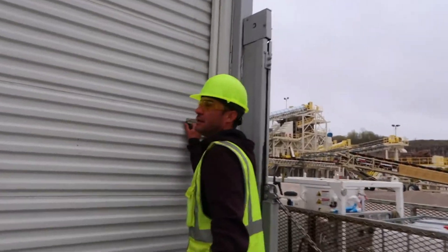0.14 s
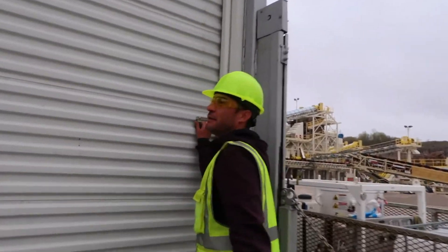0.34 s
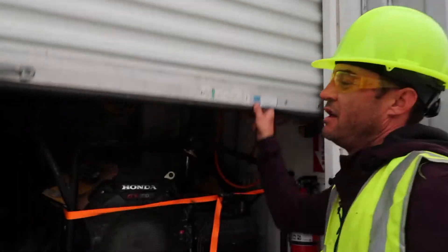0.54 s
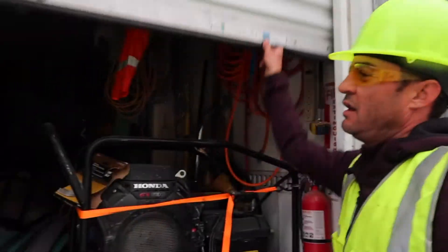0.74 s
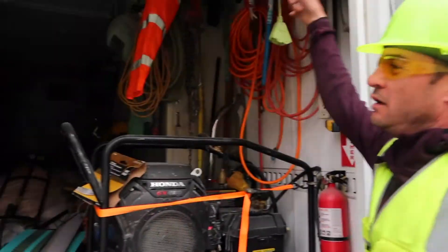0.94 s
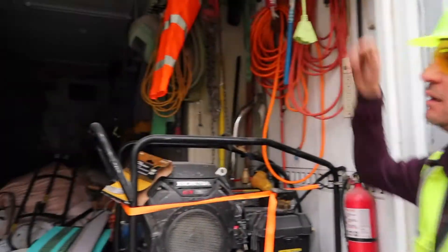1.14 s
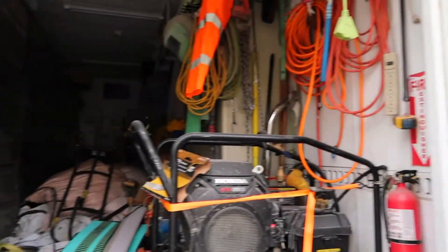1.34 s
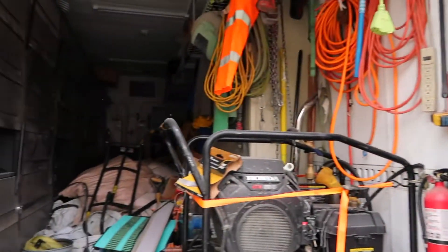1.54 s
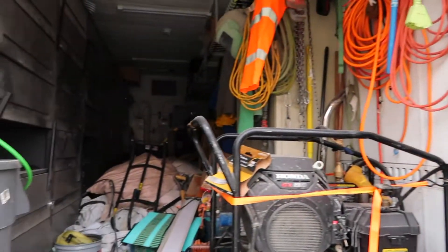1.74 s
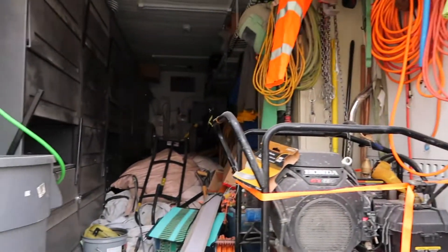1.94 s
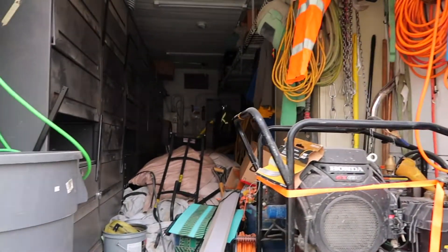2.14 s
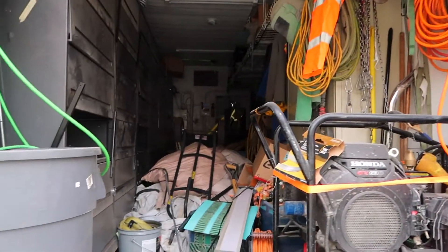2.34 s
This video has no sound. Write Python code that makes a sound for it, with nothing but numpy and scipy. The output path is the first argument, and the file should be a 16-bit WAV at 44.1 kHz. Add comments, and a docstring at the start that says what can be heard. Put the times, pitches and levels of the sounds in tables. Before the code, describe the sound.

A slatted metal roll-up door groans free and clatters rapidly up its tracks, outdoors, close by

```python
"""Slatted trailer door running up

A slatted metal door is pulled free, groaning and scraping, and runs up its tracks outdoors; it stops, then clatters again.
Streams of tiny knocks shake panel, hollow box and loose fittings: rumble, boom, rattle, and a rough note per slat clank.
Wavering tones make the groans and the clear notes of the box; filtered impulses make the hard knocks.
Filtered noise makes the scrape and a work site's far drone, with a sine for its thin whine.
"""
import sys
import numpy as np
from scipy import signal
from scipy.fft import rfft, irfft, next_fast_len
from scipy.io import wavfile
from scipy.ndimage import map_coordinates

SR = 44100
rng = np.random.default_rng(int(sys.argv[2]) if len(sys.argv) > 2 else 0)


def elevation(decibels):
    """Turn decibel levels (scalar or array-like) into linear amplitude ratios."""
    levels = np.asarray(decibels, float)
    return 10 ** (levels / 20)


def wrap_up_sound(samples):
    """Save the sound to the file named by the first command line argument, as 16-bit audio."""
    columns = np.atleast_2d(samples).T
    # keep every value between -1 and 1, then stretch to whole-number steps
    tamed = np.clip(columns, -1, 1)
    steps = np.round(tamed * 32767).astype(np.int16)
    wavfile.write(sys.argv[1], SR, steps)


N = 109412  # length in samples


def unit(x):
    """Scale to rms 1."""
    return x / np.sqrt(np.mean(x ** 2) + 1e-20)


def along(points, hz):
    """Read a curve of (f/Hz, value) points on a log frequency axis."""
    f, value = np.transpose(points)
    return np.interp(np.log(hz + 1), np.log(f + 1), value)


def curves(rows):
    """Straight-line automation: one value per sample for each column after the time."""
    t, *columns = np.transpose(rows)
    return [np.interp(np.arange(N) / SR, t, column) for column in columns]


def wobble(rate):
    """A smooth random curve with rate knots a second."""
    knots = rng.standard_normal(int(N * rate / SR) + 4)
    return map_coordinates(knots, [np.arange(N) * rate / SR])


def filtered(x, response):
    """Apply a complex response of frequency to x."""
    m = 2 * next_fast_len((N + SR // 2) // 2)
    return irfft(rfft(x, m) * response(np.fft.rfftfreq(m, 1 / SR)), m)[..., :N]


def causal(points, hz):
    """Minimum-phase response with the gain of (f/Hz, level/dB) points: it rings only after the hit."""
    cepstrum = irfft(np.log(elevation(along(points, hz))))
    cepstrum[1:len(hz) - 1] *= 2
    cepstrum[len(hz):] = 0
    return np.exp(rfft(cepstrum))


def resonances(peaks, f):
    """Sum of damped resonances (f/Hz, width/Hz, level/dB) with alternating sign."""
    total = 0
    for k, (centre, width, db) in enumerate(peaks):
        damping = 1j * f * width
        total = total + (-1) ** k * elevation(db) * damping / (centre ** 2 - f * f + damping)
    return total


def body(response):
    """Scale a response so that white noise keeps its rms."""
    return lambda hz: response(hz) / np.sqrt(np.mean(np.abs(response(hz)) ** 2))


def smear(x, decay):
    """Noise tails of energy 1 dying by (f/Hz, t60/s); each .08 s fades to a fresh one, so no fixed tone builds up."""
    hop = int(.08 * SR)
    window = np.sin(np.pi * np.arange(2 * hop) / (2 * hop))
    out = np.zeros(N + SR)
    x = np.pad(x, (hop, 2 * hop))
    for start in range(0, N + hop, hop):
        hz, t, z = signal.stft(rng.standard_normal(SR // 8), SR, nperseg=256)
        dying = z * elevation(-60 * t / along(decay, hz)[:, None])
        tail = signal.istft(dying, SR, nperseg=256)[1]
        part = signal.fftconvolve(x[start:start + 2 * hop] * window, tail / np.linalg.norm(tail))
        out[start:start + len(part)] += part
    return out[hop:hop + N]


def contacts():
    """A dense stream of tiny metal knocks of very uneven size, rms 1."""
    per_s, spread_db = 6330, 2.5  # approximate rate of the strong knocks; dB per unit of size
    chance, size, sign = rng.random(N), rng.exponential(size=N), rng.standard_normal(N)
    chosen = 1 / (1 + (chance * SR / per_s) ** 4)
    return unit(chosen * sign * elevation(spread_db * np.minimum(size, 3)))


def blow(s, db, rise, t60):
    """Strength of one jolt: quick rise, a hard short first contact, then dying away."""
    age = np.maximum(np.arange(N) / SR - s, 0)
    first = elevation(3 - 60 * age / 0.0078)  # 3 dB over the rest, t60 7.8 ms
    return (1 - np.exp(-age / rise)) * elevation(db) * (first + elevation(-60 * age / t60))


def wavering(hz, waver_hz):
    """A tone of rms 1 whose pitch wanders quickly."""
    return np.sqrt(2) * np.sin(2 * np.pi * np.cumsum(hz + waver_hz * wobble(60)) / SR)


# tone of the far machinery, relative: f/Hz, level/dB per Hz
SITE_TONE = [(15, -18), (25, -6), (70, -4), (257, -15), (472, -17.5), (722, -22.5), (2030, -27.5),
             (10500, -65), (11900, -66), (12900, -62), (14000, -85.5)]
# width of the drone: f/Hz, side over mid level/dB
SITE_WIDTH = [(60, -62), (180, -33), (550, -17), (1650, -10.5), (4970, 1.5), (15000, 6)]
# loudness of the drone: t/s, level/dB
SITE_LEVEL = [(0, -30), (1.85, -38.5), (2.48, -33)]


def site():
    """Far machinery: shaped noise as a wide drone, and a sine as a faint thin whine."""
    def tone(hz):
        return elevation(along(SITE_TONE, hz)) * elevation([0 * hz, along(SITE_WIDTH, hz)])

    mid, side = filtered(rng.standard_normal((2, N)), tone)
    level_db, = curves(SITE_LEVEL)
    drone = elevation(level_db + 0.83 * wobble(36)) * unit(np.array([mid + side, mid - side]))
    whine = elevation(-87 + 3 * wobble(15)) * np.sin(2 * np.pi * 13000 * np.arange(N) / SR)
    return drone + whine * [[1], [-.3]]  # the whine is weaker and inverted on the right


# the door on its rollers, levels before scaling by 0.918:
# t/s, panel rumble level/dB, box thud level/dB, hum level/dB, fitting rattle level/dB
ROLLING = [(0, -26, -31.5, -41, -36.5), (.2, -40.5, -29.5, -37, -82), (.36, -27.5, -26, -39, -50.5),
           (.42, -32.5, -22, -32.5, -34), (.62, -25, -31.5, -28, -31.5), (.8, -24, -40.5, -30, -36),
           (1, -28, -25.5, -28, -35.5), (1.1, -30.5, -33.5, -37.5, -42.5), (1.33, -26.5, -31.5, -34, -41.5),
           (1.47, -27.5, -33, -33.5, -43), (1.63, -33.5, -37.5, -38.5, -49), (1.71, -47, -37.5, -33, -52),
           (1.82, -50.5, -43, -56.5, -96)]


def rolling():
    """Power with which the rolling shakes panel, box, hum, lower fittings and bright fittings."""
    bright_db = -17  # bright fittings against the lower ones, scaled alike
    *rest_db, rattle_db = curves(ROLLING + [(ROLLING[-1][0] + .1, -90, -90, -90, -90)])
    db = np.array([*rest_db, rattle_db, rattle_db + bright_db])
    return elevation(2 * 0.918 * (0.86 * wobble(29.94) + db))


# tone of the slatted panel, relative: f/Hz, level/dB per Hz
PANEL_TONE = [(200, -22.5), (350, -2.5), (480, -3), (700, 0.5), (1300, -5.5), (2200, -12), (4000, -38.5),
              (8800, -64)]


def panel(shaken):
    """Knocks colour themselves in the panels as a rumble."""
    return filtered(shaken, body(lambda f: causal(PANEL_TONE, f)))


# low modes of the box, relative, before the roll-off: f/Hz, width/Hz, level/dB
BOX_MODES = [(104.4, 38, -1), (195.5, 36, -2), (417.8, 36, -6.5)]
# the door's ringing hum, relative, before the roll-off: f/Hz, width/Hz, level/dB
HUM_MODES = [(255.8, 77, -1.5), (320, 49, -2)]


def hollow_box(thudding, humming):
    """Knocks ring the low modes of the hollow box and the hum, both rolled off above 500 Hz."""
    thud = filtered(thudding, body(lambda f: resonances(BOX_MODES, f) / (1 + 1j * f / 500)))
    return thud + filtered(humming, body(lambda f: resonances(HUM_MODES, f) / (1 + 1j * f / 500)))


# tone of the loose fittings, relative: f/Hz, level/dB per Hz
FITTING_TONE = [(1180, -32), (2000, -0.5), (3020, -4), (5130, -8), (8860, -21.5), (12000, -28.5),
                (15500, -40)]
# jingle of the fittings, relative: f/Hz, width/Hz, level/dB
JINGLE_MODES = [(4030, 15.4, -0.5), (5660, 23, -6), (11300, 82, -10)]


def fittings(low, bright):
    """Knocks rattle and jingle the loose fittings in two ranges, lower and bright, with separate levels."""
    split_hz = 11000

    def metal(f):
        return causal(FITTING_TONE, f) * (1 + 2 * elevation(-10) * resonances(JINGLE_MODES, f))

    def upper(f):
        return (1j * f / split_hz / (1 + 1j * f / split_hz)) ** 4

    rattle = filtered(bright, body(lambda f: metal(f) * upper(f)))
    return rattle + filtered(low, body(lambda f: metal(f) / (1 + 1j * f / split_hz) ** 2))


# the door flexes and groans under the pull; the last row is a faint soft bump in the quiet:
# t/s, level/dB, f/Hz, t60/s
GROANS = [(0.0, -20, 710, 0.34), (0.056, -25, 425, .3), (0.067, -26.5, 696, 0.32), (0.123, -24, 742, 0.061),
          (0.237, -22, 650, .25), (0.312, -20.5, 618, 0.099), (0.344, -20, 668, .3),
          (2.075, -38.5, 407, 0.11)]


def groans():
    """Groans of the flexing door and a soft bump: quickly wavering tones that start fast and die away."""
    return sum(blow(s, db, 0.0028, t60) * wavering(hz, 45.3) for s, db, hz, t60 in GROANS)


# jolts of the fittings, before trims: t/s, level/dB, brightest part over it level/dB, t60/s
RATTLES = [(0.0024, -36, -34, 0.22), (0.285, -28.5, -22, 0.42), (0.3862, -12, -24, 0.16),
           (0.398, -13.5, -8, 0.1), (0.413, -13.5, -15, 0.17), (0.457, -10, -16.5, 0.06),
           (0.505, -12, -17, 0.25), (0.5184, -15.5, -7, 0.056), (0.591, -21.5, -14, 0.4),
           (0.6225, -13.5, -10.5, 0.14), (0.7138, -9, -17.5, 0.14), (0.821, -22, -41, 0.13),
           (0.8474, -27, -22, 0.54), (0.8977, -22, -22, 0.44), (0.9617, -21.5, -22, 0.38),
           (1.018, -24.5, -15.5, 0.14), (1.1264, -25.5, -19, 0.25), (1.2587, -17.5, -27, 0.2),
           (1.3546, -21.5, -21.5, 0.5), (1.3803, -16.5, -25, 0.12), (1.556, -23.5, -32, 0.052),
           (2.4198, -18, -17, 0.21), (2.4677, -13, -19, 0.21)]


def rattle_jolts():
    """Power with which single jolts shake the lower and the bright fittings."""
    trim_db, bright_trim_db, rise_s = -7, 6.5, 0.0022
    power = np.zeros((2, N))
    for s, db, bright, t60 in RATTLES:
        power += (blow(s, db + trim_db, rise_s, t60) * elevation([[0], [bright + bright_trim_db]])) ** 2
    return power


# tone of the scrape, relative: f/Hz, level/dB per Hz
SCRAPE_TONE = [(2350, -24), (4000, 5.5), (6250, -9), (11900, -2), (15500, -31)]
# the slide scraping as the door is freed: t/s, level/dB
SCRAPE_LEVEL = [(.225, -75), (.25, -51), (.29, -46), (.32, -44), (.385, -52)]


def scrape():
    """A fine bright hiss swells while metal slides on metal."""
    silent_after = SCRAPE_LEVEL[-1][0] + .02
    db, = curves([(0, -100)] + SCRAPE_LEVEL + [(silent_after, -100)])
    hiss = unit(filtered(rng.standard_normal(N), lambda hz: elevation(along(SCRAPE_TONE, hz))))
    return elevation(db + 0.91 * wobble(25)) * hiss


# slats clanking round the bend, before trims: t/s, level/dB, boom over it level/dB, f/Hz, t60/s
CLANKS = [(0.384, -5, -7.5, 755, 0.48), (0.431, -8, -6, 690, 0.14), (0.483, -9, -1, 672, 0.54),
          (0.512, -1.5, -26, 1203, 0.15), (0.53, -11, -11, 710, 0.19), (0.565, -6.5, 7.5, 638, 0.13),
          (0.596, -5, -3.5, 594, 0.34), (0.622, -17, -21, 950, 0.29), (0.72, -13, -25, 1530, 0.27),
          (0.845, -12.5, 1, 1360, 0.59), (0.913, -10.5, -6, 527, 0.34), (0.961, -10, -1.5, 830, 0.45),
          (0.989, -5, -23, 560, 0.2), (1.133, -6, -15, 720, 0.22), (1.166, -7.5, 2, 645, 0.054),
          (1.253, -4, -10, 923, 0.23), (1.372, -9, -11, 1550, 0.3), (1.393, -10.5, 4, 1010, 0.25),
          (1.43, -6.5, -25, 1480, 0.078), (1.563, -10.5, -15, 1390, 0.15), (1.612, -20, -22, 544, 0.12),
          (1.652, -10, -4.5, 1104, 0.19), (2.42, -9.5, -0.5, 1540, 0.18), (2.463, -5.5, -6, 1176, 0.15)]
CLANK_TRIM_DB, CLANK_RISE_S = -11, 0.0013


def clank_jolts():
    """Power with which each clank shakes panel, box and hum."""
    thud_trim_db, hum_trim_db = -7, 0.5
    power = np.zeros((3, N))
    for s, db, boom, hz, t60 in CLANKS:
        shares = elevation([[0], [boom + thud_trim_db], [boom + hum_trim_db]])
        power += (blow(s, db + CLANK_TRIM_DB, CLANK_RISE_S, t60) * shares) ** 2
    return power


def clank_notes():
    """Each slat sounds a rough note of its own: knocks through two equal resonances in a row."""
    note_trim_db, width = -4.5, 0.2  # width of each resonance over its pitch
    total = np.zeros(N)
    for s, db, boom, hz, t60 in CLANKS:
        knocks = contacts() * blow(s, db + CLANK_TRIM_DB + note_trim_db, CLANK_RISE_S, t60)
        b, a = signal.iirpeak(hz, 1 / width, SR)
        note = signal.lfilter(b, a, signal.lfilter(b, a, knocks))
        total += note / np.sqrt(np.pi * width * hz / SR / 2)
    return total


# the open box rings on clear notes near 260 to 280 Hz, in swells: start t/s, end t/s, level/dB, f/Hz
RINGS = [(0.552, 0.638, -22.5, 280.6), (1.104, 1.18, -24, 261.4), (1.201, 1.327, -25, 260),
         (1.361, 1.436, -19, 261.7), (1.45, 1.525, -26, 264.3), (1.538, 1.637, -31, 255.8),
         (1.666, 1.739, -32, 283)]


def rings():
    """Clear, slightly wavering notes that swell and fade."""
    edge_s, waver_hz = 0.02, 5.3
    t = np.arange(N) / SR
    total = np.zeros(N)
    for start, end, db, hz in RINGS:
        swell = np.clip(np.minimum(t - start, end - t) / edge_s, 0, 1)
        total += swell * elevation(db) * wavering(hz, waver_hz)
    return elevation(1.3 * wobble(40.65)) * total


# hard single knocks of slat on slat, peaks before the shimmer: t/s, level/dB
STRIKES = [(.626, 3), (.7225, -2), (1.136, -12.5), (1.258, -6), (1.653, -13)]
# tone of such a knock, relative: f/Hz, level/dB per Hz
STRIKE_TONE = [(250, -4), (700, -2), (2500, -8.5), (7000, -24), (14000, -41)]


def strikes():
    """Each hard knock is one short crack: an impulse through the knock's tone."""
    s, db = np.transpose(STRIKES)
    hits = np.bincount(np.round(s * SR).astype(int), elevation(db), N)
    shape = lambda f: causal(STRIKE_TONE, f)
    return filtered(hits, shape) / np.abs(filtered(np.arange(N) == 0, shape)).max()


# shimmer of the sheet metal: f/Hz, t60/s
SHEET_DECAY = [(200, 0.23), (1000, 0.057), (4000, 0.052), (12000, 0.03)]


def door():
    """Rolling and jolts drive knocks into panel, box and fittings; the sheet shimmers after them."""
    power = rolling()
    power[:3] += clank_jolts()
    power[3:] += rattle_jolts()
    judder = elevation(1.1 * wobble(180))  # quick judder of the rollers, shared by all parts
    shaken = np.sqrt(power) * judder * [contacts() for _ in range(5)]
    thin = panel(shaken[0]) + fittings(shaken[3], shaken[4])
    thin += groans() + clank_notes() + strikes()
    sheet_db = -6.5  # shimmer against the direct sound
    shimmering = (thin + elevation(sheet_db) * smear(thin, SHEET_DECAY)) / np.sqrt(1 + elevation(2 * sheet_db))
    return shimmering + hollow_box(shaken[1], shaken[2])


# left port over right: f/Hz, level/dB
LEFT_OVER_RIGHT = [(200, 0), (1500, 1.2), (5000, .7), (10000, -.2)]
# unrelated share at the ports: f/Hz, level/dB
UNRELATED = [(60, -70), (1000, -19.5), (3000, -11.5), (6000, -3.5), (10000, -1), (14000, -2)]


def scene():
    """The door reaches two close microphone ports a little differently; the site lies around it."""
    lead_s = 1.8e-5  # the left port hears the door first
    x = door() + scrape() + rings()
    half = np.array([[.5], [-.5]])

    def ports(hz):
        return elevation(half * along(LEFT_OVER_RIGHT, hz)) * np.exp(2j * np.pi * half * hz * lead_s)

    pair = filtered(x, ports)
    apart = filtered(smear(x, [(500, .012)]), lambda hz: elevation(along(UNRELATED, hz)))  # t60 12 ms
    return pair + apart * [[1], [-1]] + site()


def top_cut(x):
    """Nothing passes above the cut-off."""
    return signal.sosfilt(signal.butter(12, 15610, fs=SR, output="sos"), x)


def record(dry):
    """Pass the finished mix to the last stage."""
    return top_cut(dry)


dry = scene()
out = record(dry)
wrap_up_sound(out)
```